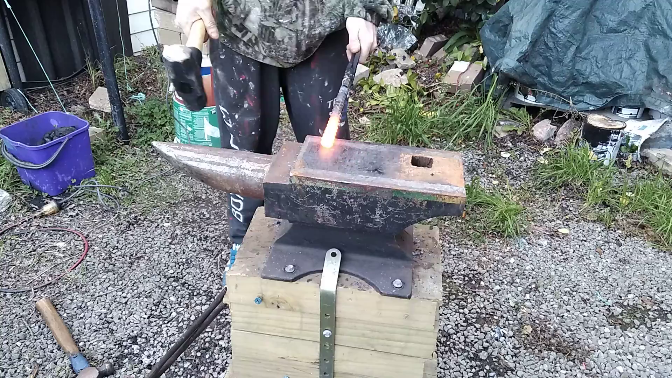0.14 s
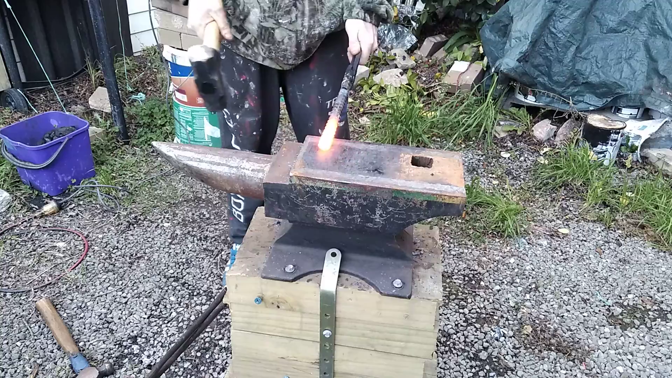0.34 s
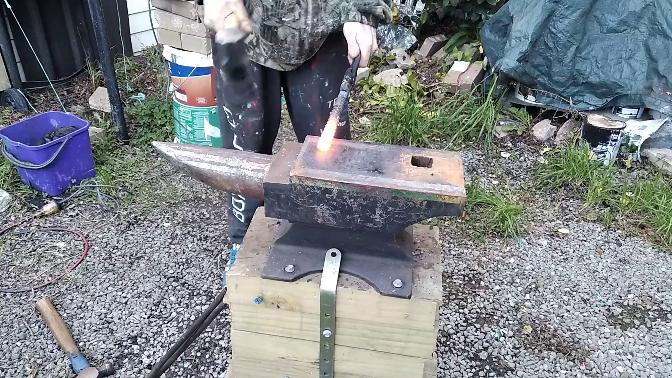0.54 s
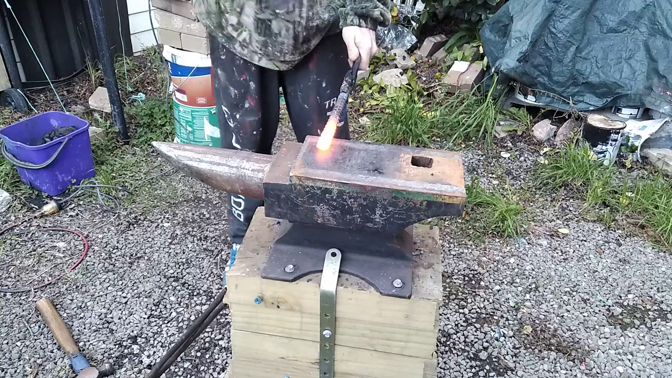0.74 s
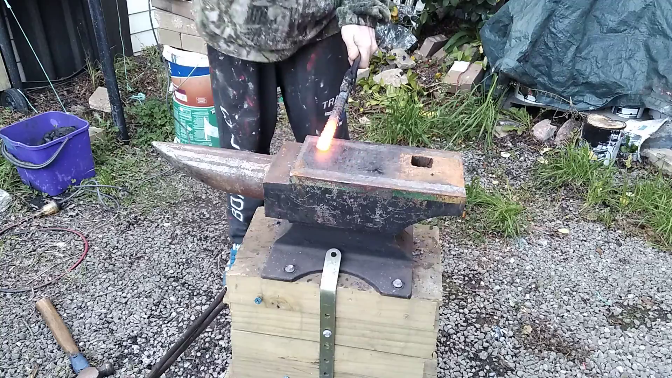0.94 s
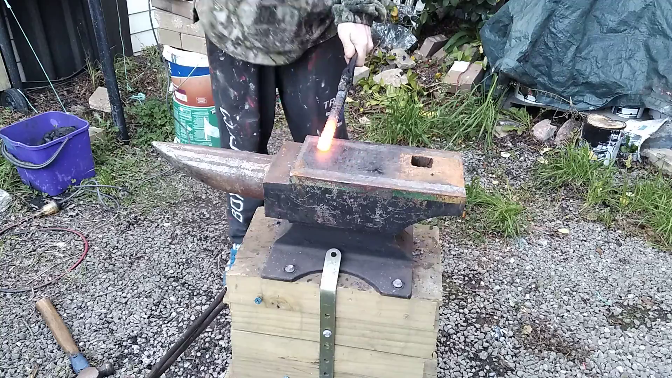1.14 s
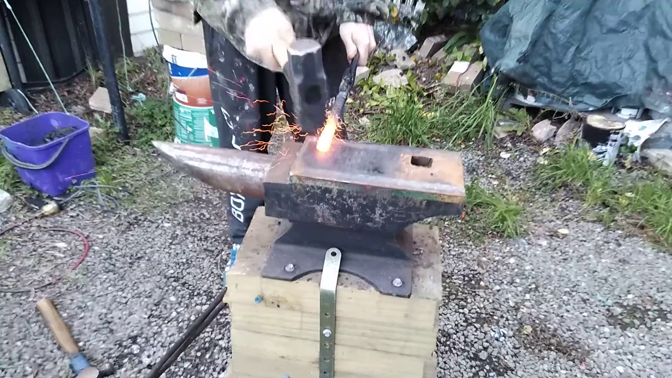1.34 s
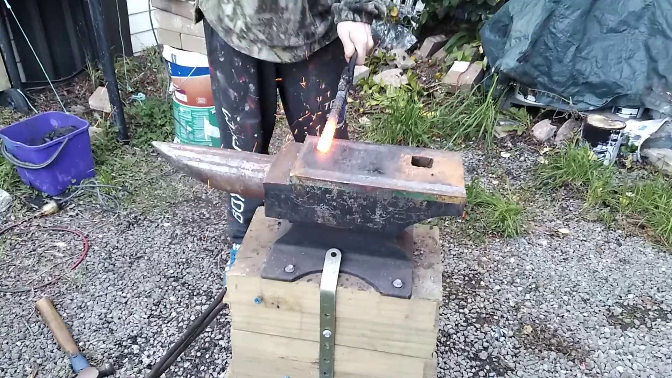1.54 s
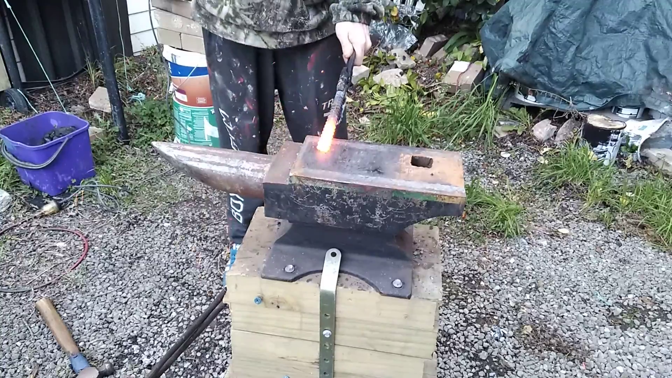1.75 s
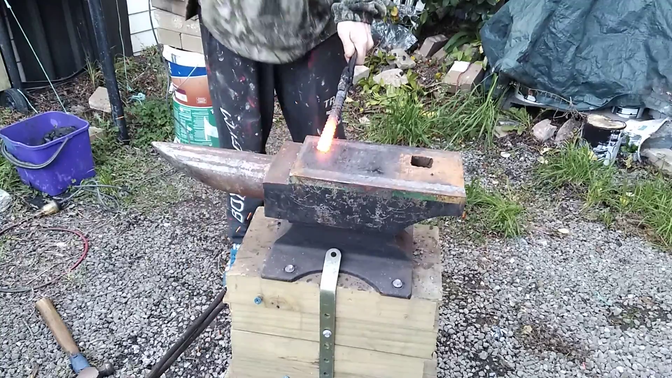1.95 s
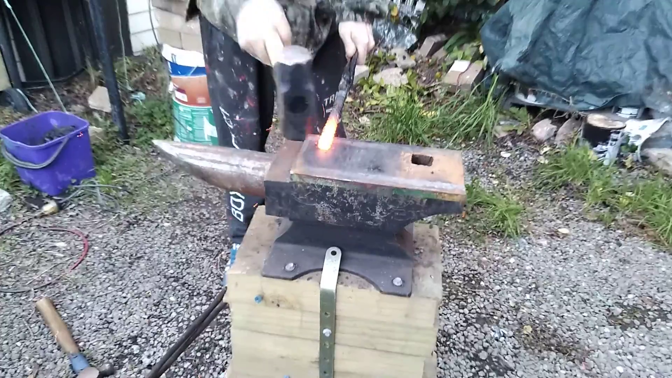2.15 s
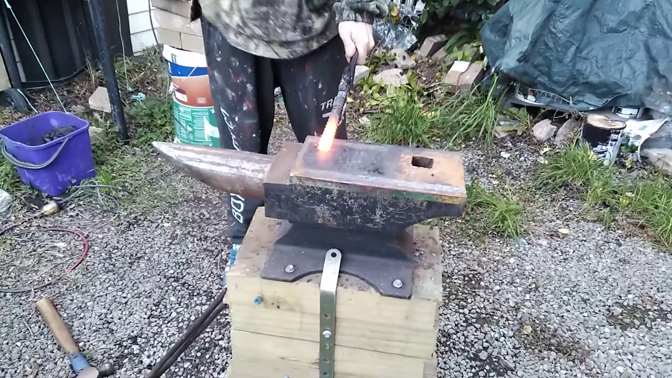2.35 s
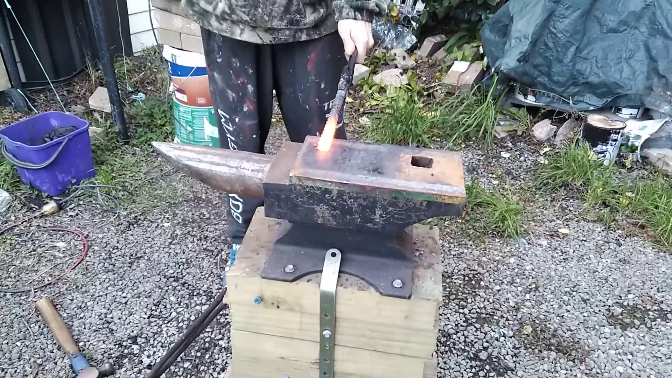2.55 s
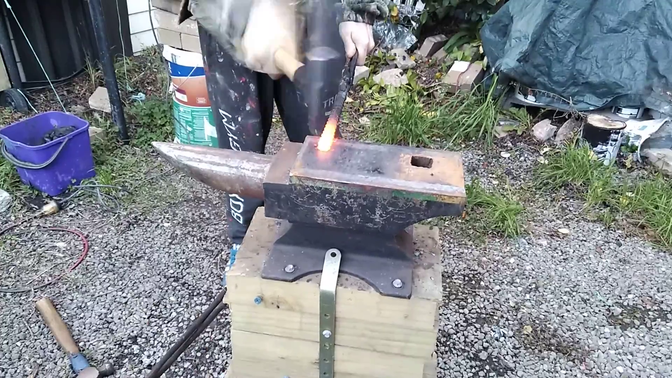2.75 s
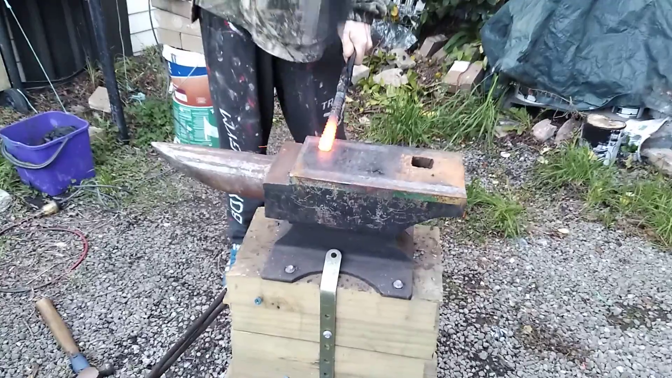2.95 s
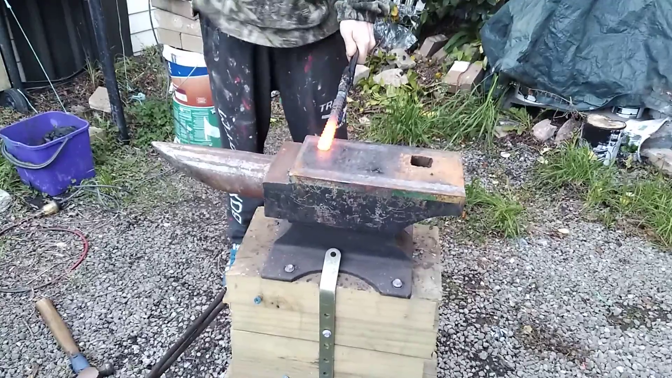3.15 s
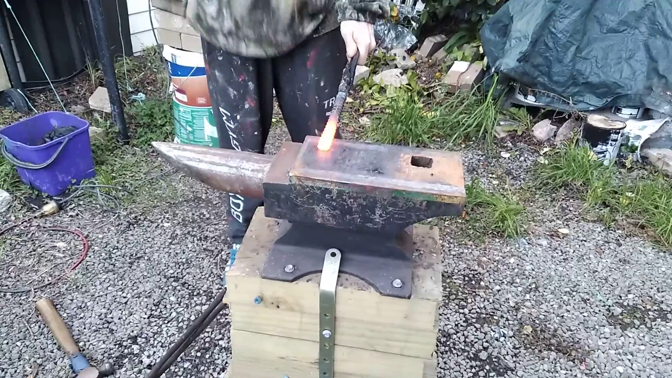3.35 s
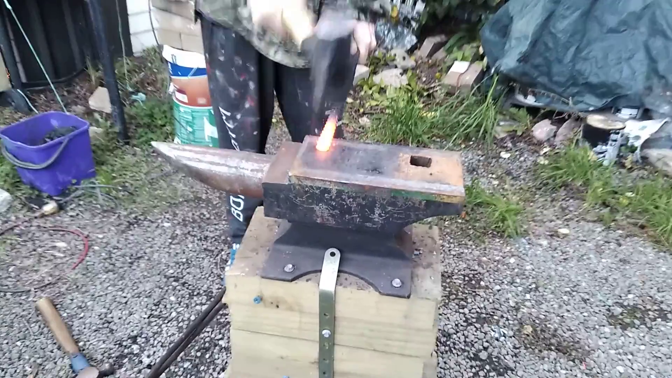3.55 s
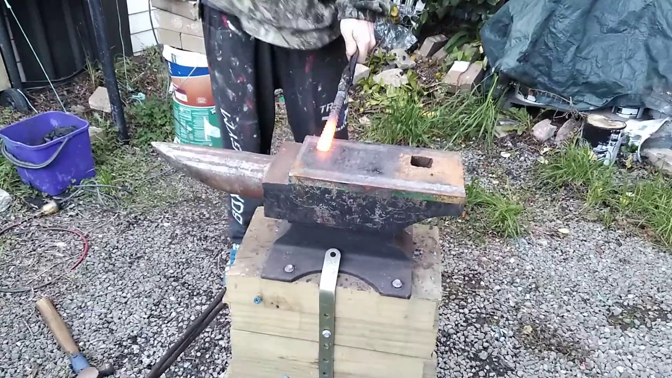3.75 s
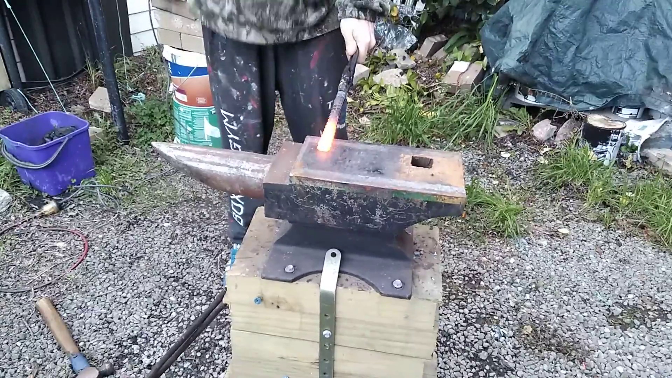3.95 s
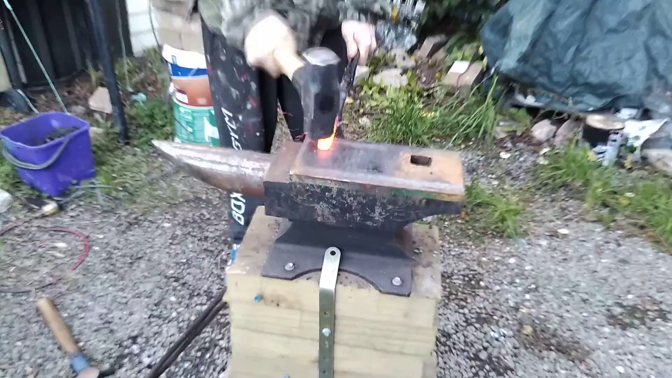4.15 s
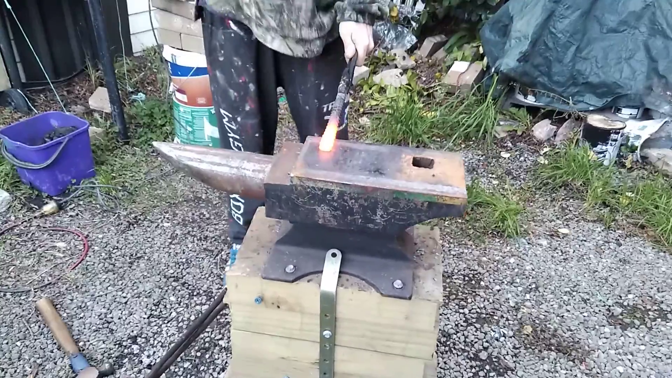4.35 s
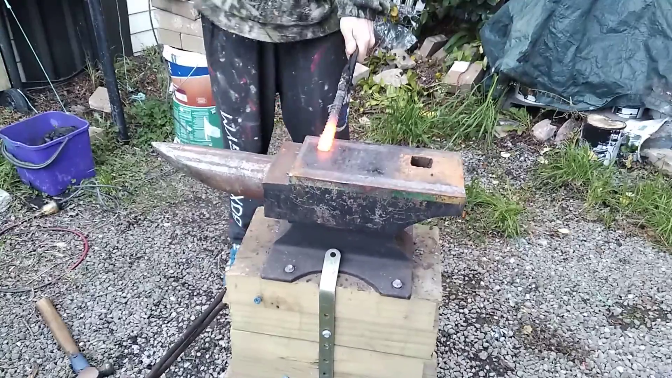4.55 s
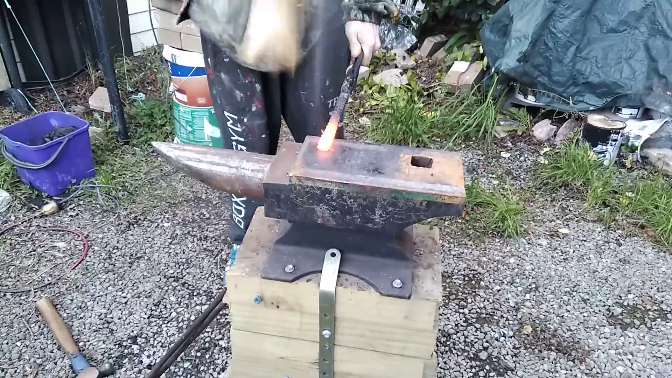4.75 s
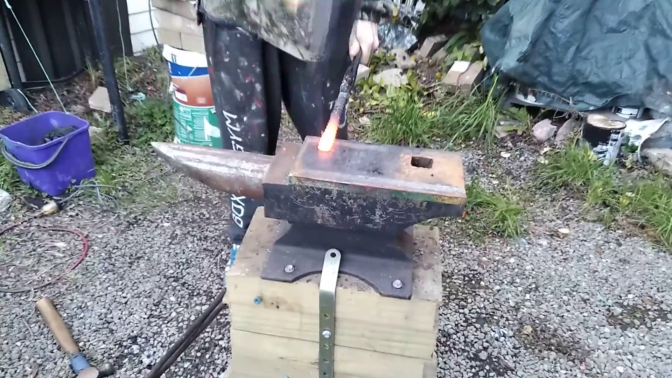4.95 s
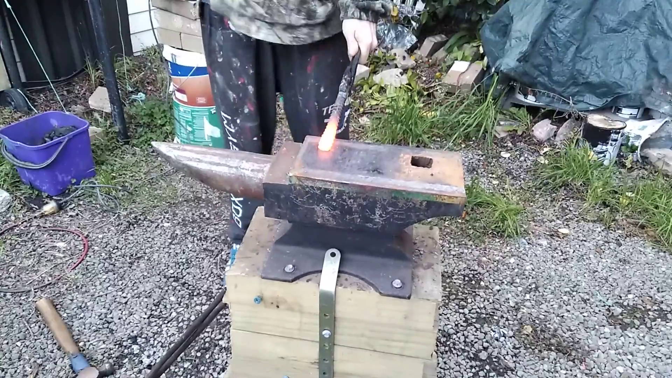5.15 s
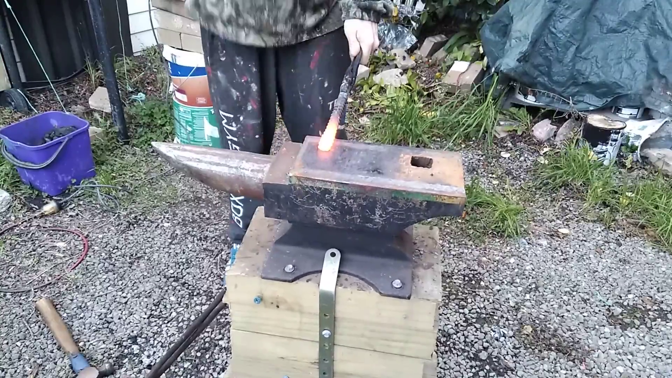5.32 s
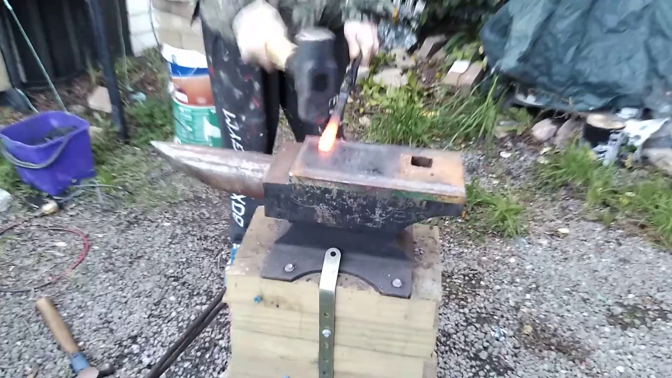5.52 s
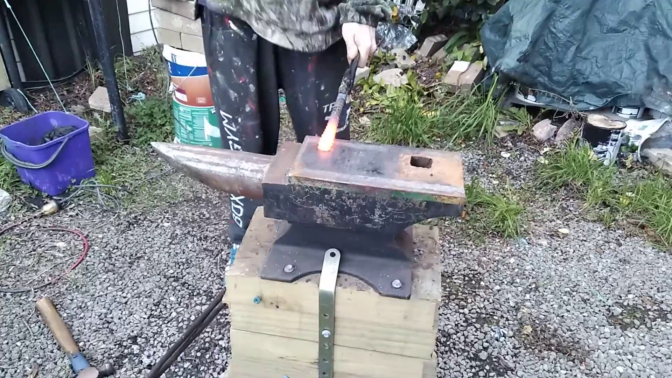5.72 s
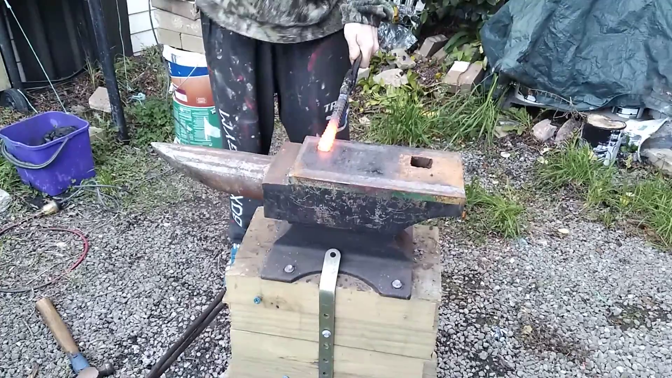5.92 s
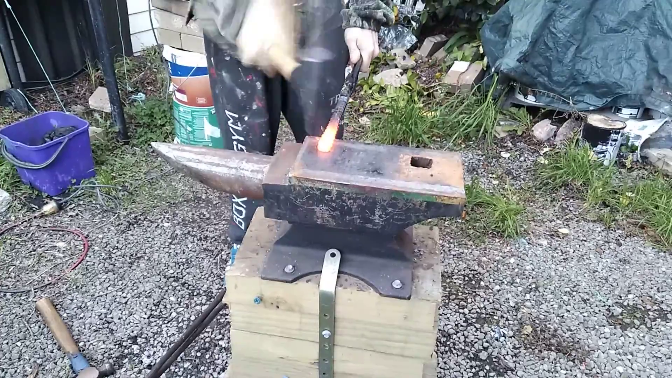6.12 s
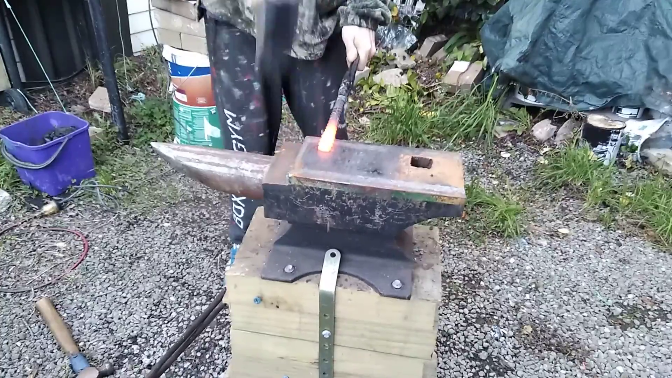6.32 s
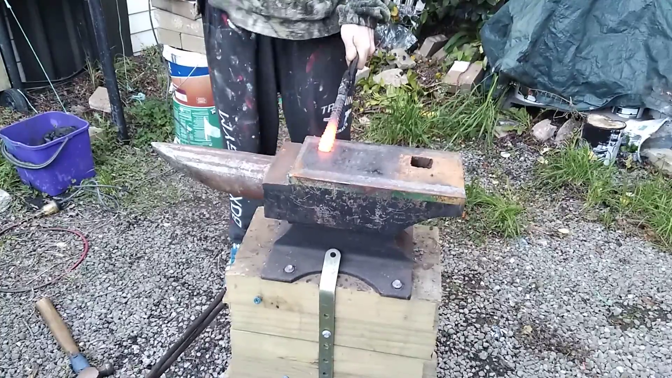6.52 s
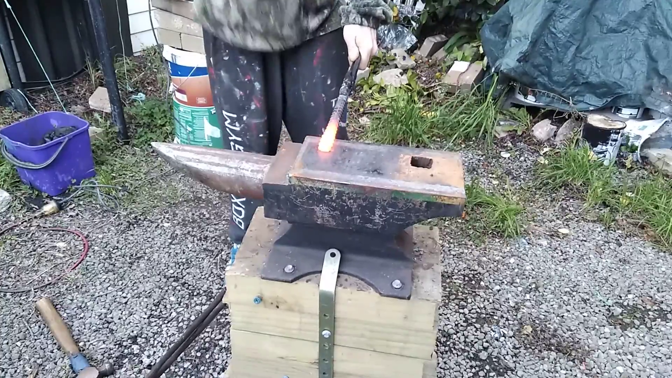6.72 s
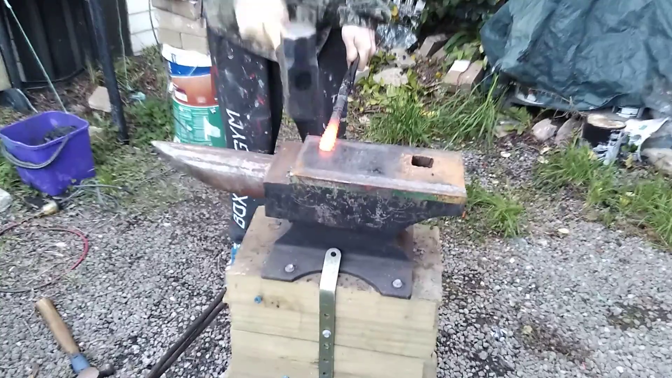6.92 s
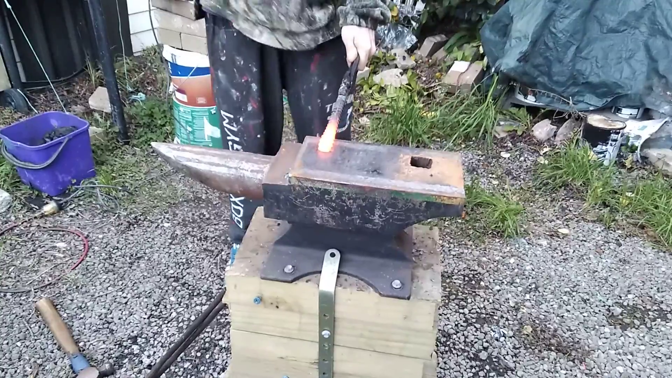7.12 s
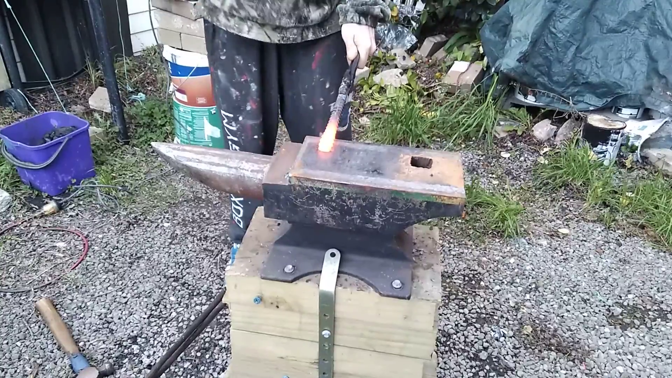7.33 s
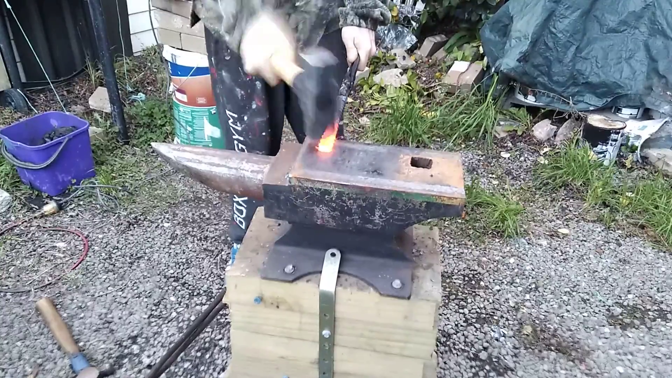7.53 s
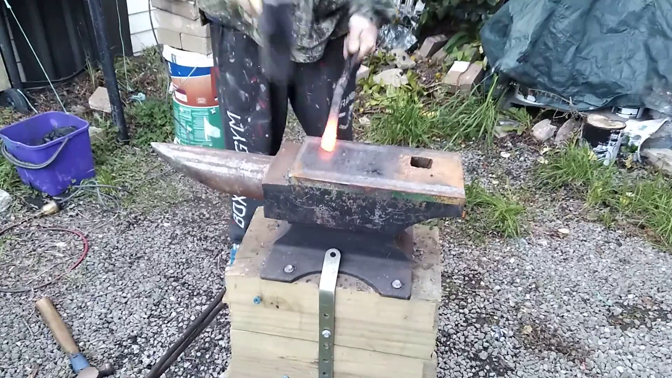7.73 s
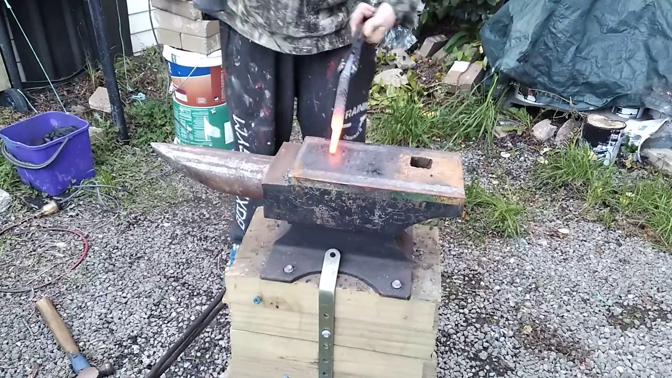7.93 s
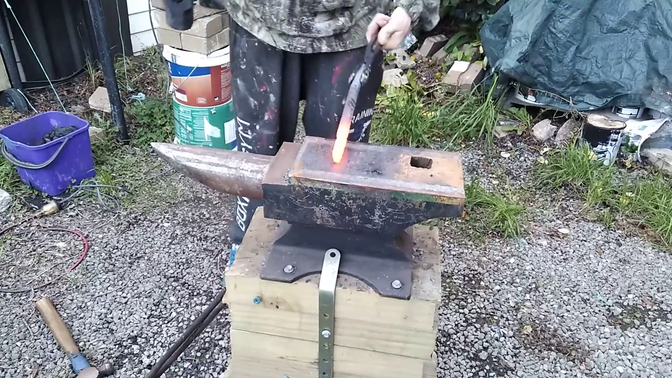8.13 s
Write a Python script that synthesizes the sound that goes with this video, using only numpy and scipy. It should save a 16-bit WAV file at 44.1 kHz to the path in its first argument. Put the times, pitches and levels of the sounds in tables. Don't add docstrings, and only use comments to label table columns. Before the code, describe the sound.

A hand hammer strikes a steel bar on an anvil about every 0.7 seconds, loud, clipped, short-ringing clanks above a quiet airy blower.

```python
import sys
import numpy as np
from scipy import signal
from scipy.fft import rfft, irfft, next_fast_len
from scipy.io import wavfile
from scipy.ndimage import uniform_filter1d

SR = 44100
rng = np.random.default_rng(int(sys.argv[2]) if len(sys.argv) > 2 else 0)


def transcribe(u):
    v = np.clip(np.atleast_2d(u).T, -1, 1)
    q = np.round(v * 32767).astype(np.int16)
    wavfile.write(sys.argv[1], SR, q)


def invert_db(level):
    return 10 ** (np.asarray(level, dtype=float) / 20)


N = 360738

# start in seconds, strength in dB, looseness of grip (-1..1),
# landing from face (-) to horn (+), landing from edge (-) to heel (+).
BLOWS = [
    (1.291, -3.5, -0.82, 0.82, 1),
    (2.061, -2, -0.59, 0.22, 0.22),
    (2.756, -3.5, -1, 0.083, -1.6),
    (3.433, -2, 0.5, -0.34, 0.7),
    (4.1, -3, -0.042, 0.66, 0.74),
    (4.77, -3, 0.94, -1.8, 0.97),
    (5.449, -1.5, 0.32, -.1, .4),
    (6.131, -2.5, 0.72, -0.37, 0.13),
    (6.838, -2, 1, -0.11, -1.5),
    (7.522, -5, -0.37, 0.57, 1),
]
USUAL_DB = -2.5


def on_log(table, hz, column=1):
    t = np.array(table, float)
    return np.interp(np.log(np.maximum(hz, 1)), np.log(t[:, 0]), t[:, int(column)])


def bands(size, alike_hz, lag):
    f = np.fft.rfftfreq(size, 1 / SR)
    right, other = rfft(rng.standard_normal((2, size)))
    alike = np.clip(0.75 / (1 + (f / alike_hz) ** 2) + 0.21, 0, 0.97)
    delayed = right * np.exp(-2j * np.pi * f * lag / SR)
    left = alike * delayed + np.sqrt(1 - alike ** 2) * other
    place = 3 * np.log2(np.maximum(f, 1) / 20)
    for k in range(30):
        window = np.cos(np.pi / 2 * np.clip(place - k, -1, 1))
        yield 20 * 2 ** (k / 3), irfft(window * np.array([left, right]), size)


def walk(rate_hz):
    k = int(SR / rate_hz)
    held = np.repeat(rng.standard_normal(N // k + 1), k)
    return 1.22 * uniform_filter1d(uniform_filter1d(held, k), k)[:N]


def add(out, sound, start_s):
    i = int(start_s * SR)
    out[:, i:i + sound.shape[1]] += sound[:, :N - i]


def blow(thud_db, stretch, bright_db_oct, chatter_s, parts_db):
    t = np.arange(SR * 2 // 5) / SR
    # frequency in Hz, level in dB, t60 in seconds.
    bend = [(645, -25, 0.26), (796, -17, 0.22), (875, -15, 0.2), (980, -27, 0.28)]
    shank = [(1130, -29, 0.35), (1175, -20, 0.31), (1248, -22, 0.35), (1324, -19, 0.35), (1410, -26, 0.35),
             (1550, -18, 0.29), (1635, -14, 0.24), (1755, -21, 0.24)]
    grip = [(2035, -23, .3), (2110, -21, .35), (2185, -24, .31), (2225, -23, .35), (2325, -20, .28),
            (2500, -27, .3)]
    face = [(3165, -30, 0.35), (3310, -28, 0.31), (3385, -20, 0.24), (3415, -16, 0.24), (3683, -16, 0.17),
            (4190, -28, 0.28), (4240, -21, 0.2), (4562, -25, 0.21)]
    horn = [(4920, -16, .19), (4990, -17, .18), (5146, -19, .21)]
    heel = [(5600, -24, .18), (5735, -18, .2)]
    hammer = [(6365, -30, .19), (6815, -35, .17), (7041, -36, .19), (7428, -41, .2), (8510, -39, .16),
              (9030, -46, .2), (9800, -42, .14), (10700, -44, .16), (11035, -42, .14)]
    block = [(107, -33, 0.35), (172, -18, 0.22), (362, -21, 0.21), (415, -32, 0.35), (560, -18, 0.21)]
    yard = scatter(t, thud_db, stretch, bright_db_oct)
    crack = yard + 2.04 * np.exp(-t / 0.005) * yard[1]
    steel = invert_db(2.5) * ring(hammer, t, stretch, scatter_db=2, rattle=0.79)
    for part, db in zip((bend, shank, grip, face, horn, heel), parts_db):
        steel = steel + invert_db(db - 5) * ring(part, t, 1.049 * stretch, scatter_db=1.5, rattle=0.42)
    wood = invert_db(thud_db + 3.0) * ring(block, t, 0.78, scatter_db=1.5, rattle=0.71)
    chatter = 1 + 0.44 * np.exp(-(t / chatter_s) ** 4)
    return chatter * (invert_db(1.72) * crack + steel) + wood


def ring(modes, t, stretch, scatter_db, rattle):
    hz, db, t60_s = np.array(modes, float).T[:, None, :, None]
    chance = rng.standard_normal((3, 2, len(modes), 1))
    steps = np.repeat(rng.standard_normal((2, len(modes), len(t) // 500 + 1)), 500, axis=2)
    waver = uniform_filter1d(steps, size=500, axis=2)[:, :, :len(t)]
    level_db = db + scatter_db * (chance[0, :1] + chance[1])
    gain = invert_db(level_db - 60 * t / (t60_s * stretch))
    side = np.array([1, -1])[:, None, None]
    apart = side * np.sign(chance[2, 1]) * 0.9 * hz / (hz + 400)
    detuned_hz = hz * (1 + 0.001 * chance[2, 0])
    phase = 2 * np.pi * detuned_hz * t + 3 * chance[0, 1] + apart
    return np.sum(gain * (1 + rattle * waver[0]) * np.sin(phase + rattle * waver[1]), axis=1)


def scatter(t, thud_db, stretch, bright_db_oct):
    # frequency in Hz, density in dB per Hz, t60 in seconds.
    answer = [(40, -3, 0.62), (74.6, -4.5, 0.28), (123, -6.5, 0.28), (276, -6, 0.19), (690, -5.5, 0.27),
              (1260, -7, 0.21), (1866, -1, 0.31), (2380, -14, 0.24), (2560, -6, 0.28), (3130, -6, 0.21),
              (4300, -10.5, 0.24), (6550, -18.5, 0.21), (9100, -32, 0.21), (11600, -51.5, 0.31),
              (15200, -27, 0.2)]
    patches_db = 2.76 * np.repeat(rng.standard_normal((30, len(t) // 256 + 1)), 256, axis=1)
    patchy = uniform_filter1d(invert_db(patches_db[:, :len(t)]), size=256, axis=1)
    yard = 0
    for k, (hz, noise) in enumerate(bands(len(t), 210, 2.5)):
        thud = thud_db / (1 + (hz / 800) ** 2) / (1 + (120 / hz) ** 2)
        db = on_log(answer, hz) + bright_db_oct * np.log2(hz / 2000) + thud
        fade = invert_db(db - 60 * t / (on_log(answer, hz, column=2) * stretch))
        yard = yard + noise * patchy[k] * fade * (1 - np.exp(-t * hz / 0.19))
    return yard


def bounce(hz, treble_db):
    t = np.arange(SR // 20) / SR
    band = signal.butter(2, [3500, 4500], "band", fs=SR)
    grit = signal.lfilter(*band, rng.standard_normal((2, len(t))))
    tick = invert_db(treble_db) * grit * t / 0.002 * np.exp(1 - t / 0.002)
    return np.sin(2 * np.pi * hz * t) * t / 0.00076 * np.exp(1 - t / 0.0009) + tick


def spark():
    t = np.arange(SR // 50) / SR
    return rng.standard_normal((2, len(t))) * np.exp(-t / 0.0018)


def shudder():
    calm_db, lift_db, peak_s = -4.5, 11.5, 0.13
    since = np.maximum(np.arange(N) / SR - np.array(BLOWS)[:, :1], 0) / peak_s
    return calm_db + lift_db * np.sum(since * np.exp(1 - since), axis=0)


def blower():
    # frequency in Hz, density in dB per Hz.
    air_table = [(30, 8.5), (62, 3.5), (110, 1.5), (170, -9), (300, 0.5), (700, -6), (1200, -2.5),
                 (1900, -3), (2200, -8.5), (3500, -10), (4500, -17), (7000, -26.5), (10000, -36),
                 (15000, -43.5)]
    # multiple of blade rate, level in dB.
    blade = [(2, 3), (4, 3), (5, -4)]
    air_db, whine_db, blade_hz = -42.5, -62.5, 833.6
    air, swell = 0, walk(1.0)
    rumble_db = shudder()
    for hz, noise in bands(N, 510, 9.2):
        bass_db = (rumble_db + 3.4 * walk(3.04)) / (1 + (hz / 160) ** 3)
        air = air + noise * invert_db(on_log(air_table, hz) + 0.23 * swell + 0.73 * walk(13) + bass_db)
    turn = 2 * np.pi * np.cumsum(blade_hz * (1 + 0.00105 * walk(4))) / SR
    tones = sum(invert_db(db + whine_db + 1.2 * walk(6.1)) * np.sin(k * turn) for k, db in blade)
    return air * invert_db(air_db) / air.std() + tones * invert_db(np.array([[-4.5], [2.5]]))


def scene():
    # level in dB, dB per looseness, dB per horn landing,
    # dB per heel landing.
    aim = [
        (-3, -7.5, .1, .6),
        (-3.4, -4.5, -1, .1),
        (0.4, -2, -0.2, 3),
        (4, 1.5, -2.5, -1.5),
        (0.7, -0.6, 9, -0.3),
        (-0.3, -0.2, 1, 4.5),
    ]
    # start in seconds, peak in dB, frequency in Hz, treble in dB.
    rebounds = [
        (2.915, -31.5, 730, -18),
        (4.899, -14, 690, 1),
        (4.931, -27, 730, -16),
    ]
    out = blower()
    for start_s, db, loose, horn, heel in BLOWS:
        thud_db = -0.2 - 2 * (db - USUAL_DB)
        stretch = 1.023 + 0.13 * loose
        bright_db_oct = 0.35 + 0.57 * loose
        chatter_s = max(0.054 + 0.023 * loose, 0.01)
        parts_db = np.array(aim) @ [1, loose, horn, heel]
        add(out, invert_db(db + 3.5) * blow(thud_db, stretch, bright_db_oct, chatter_s, parts_db), start_s)
    for start_s, db, hz, treble_db in rebounds:
        add(out, invert_db(db) * bounce(hz, treble_db), start_s)
    add(out, invert_db(-48) * spark(), 0.433)
    return out


def sag():
    t = np.arange(SR) / SR
    pole = np.exp(-1 / (0.113 * SR))
    pull = -t * np.exp(-t / 0.019)
    swing = signal.lfilter([1, -2, 1], [1, -2 * pole, pole ** 2], pull)
    swing = swing / swing[int(0.11 * SR)]
    out = np.zeros((2, N))
    for start_s, db, *_ in BLOWS:
        left, right = 0.09, 0.45 * invert_db(3.5 * (db - USUAL_DB))
        add(out, np.outer([left, right], swing), start_s)
    return np.where(out < 0, 0.85 * np.tanh(out / 0.85), out)


def band_limit(x):
    return signal.sosfilt(signal.butter(12, 15780, fs=SR, output="sos"), x)


def record(dry):
    # frequency in Hz, width in Hz.
    ports = [
        (7200, 1020),
        (10750, 760),
    ]
    size = next_fast_len(N)
    f = np.fft.rfftfreq(size, 1 / SR)
    cavity = np.array([1 / (1 - (f / hz) ** 2 + 1j * f * width_hz / hz ** 2) for hz, width_hz in ports])
    heard = irfft(rfft(dry, size) * cavity, size)[:, :N] + sag()
    rounded = heard / (1 + heard ** 8) ** (1 / 8)
    dulled = signal.lfilter(*signal.butter(1, 9000, fs=SR), rounded)
    hiss = invert_db(-82) * rng.standard_normal((2, N))
    return band_limit(dulled + hiss)


dry = scene()
out = record(dry)
transcribe(out)
```